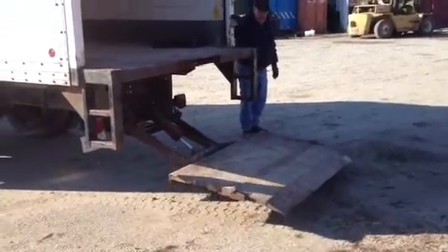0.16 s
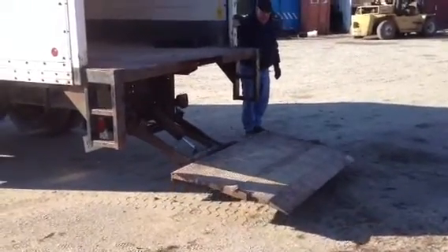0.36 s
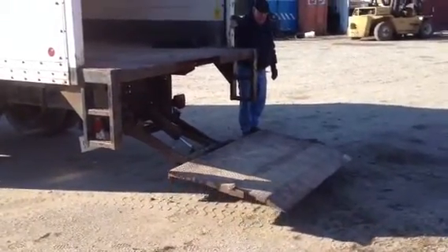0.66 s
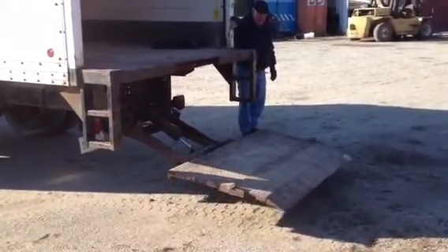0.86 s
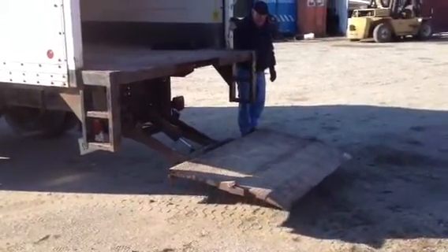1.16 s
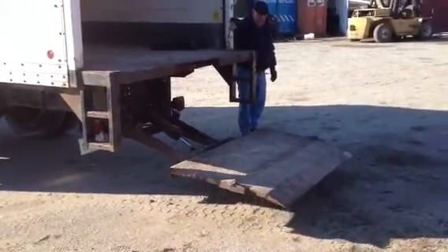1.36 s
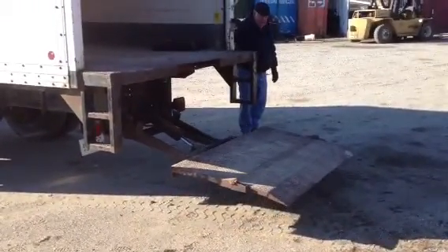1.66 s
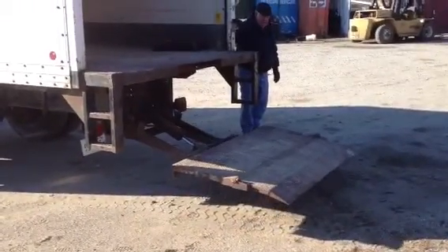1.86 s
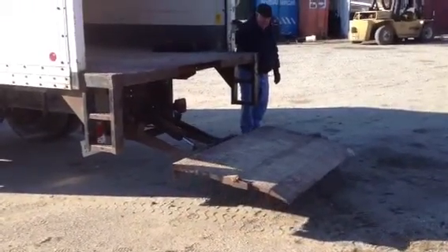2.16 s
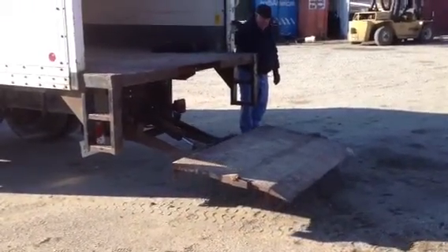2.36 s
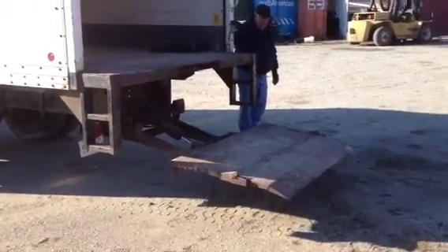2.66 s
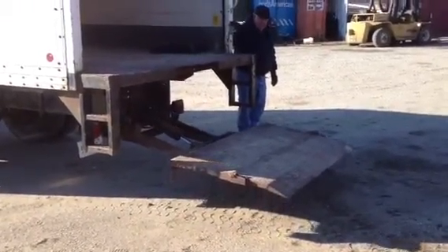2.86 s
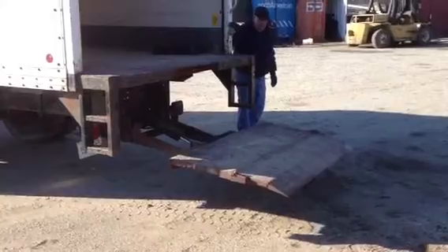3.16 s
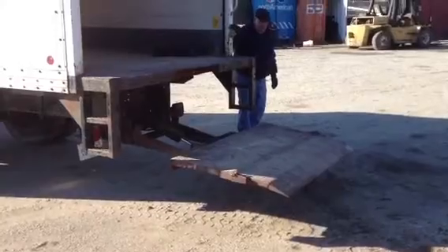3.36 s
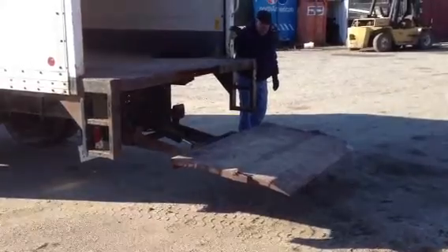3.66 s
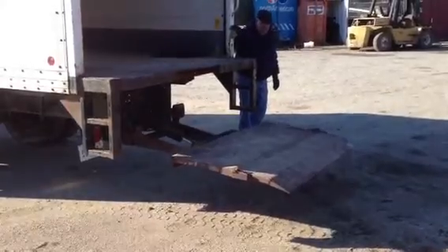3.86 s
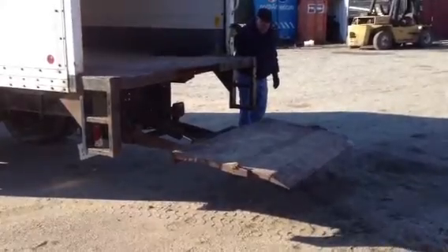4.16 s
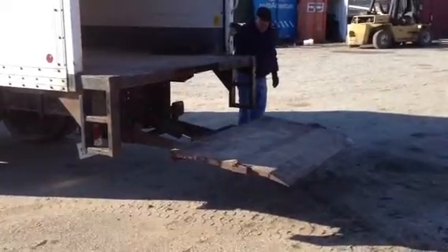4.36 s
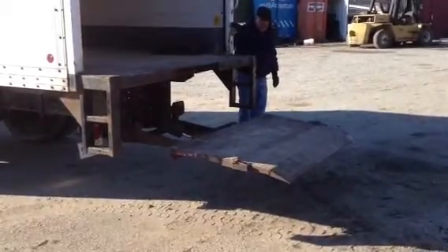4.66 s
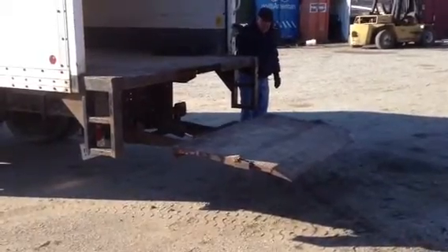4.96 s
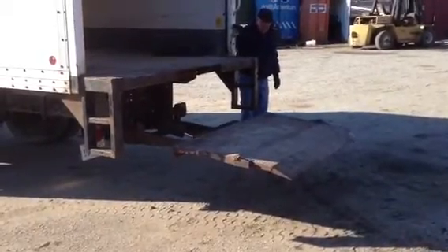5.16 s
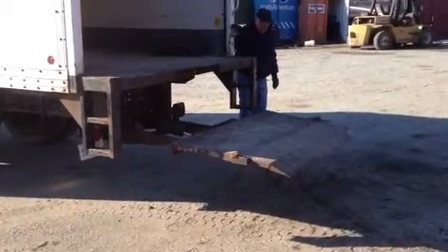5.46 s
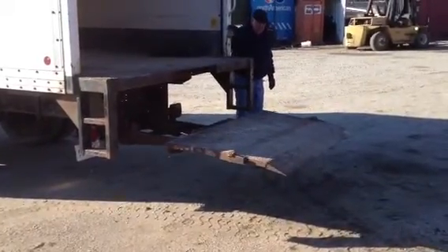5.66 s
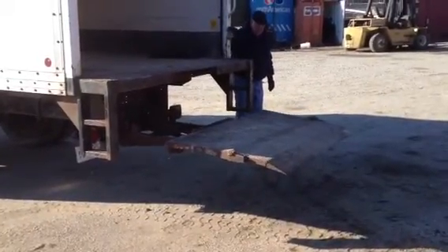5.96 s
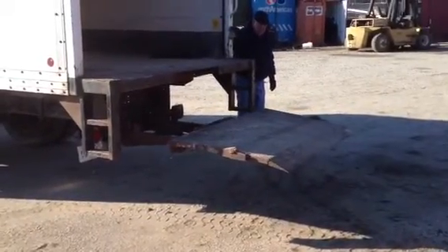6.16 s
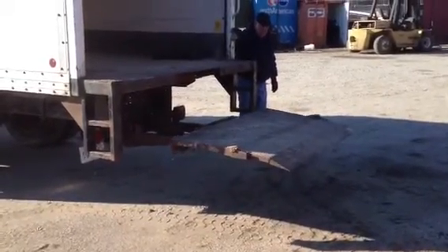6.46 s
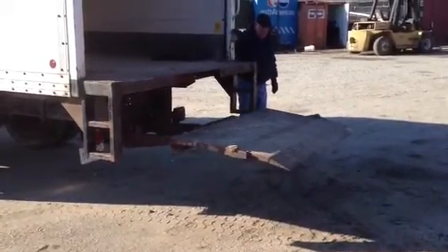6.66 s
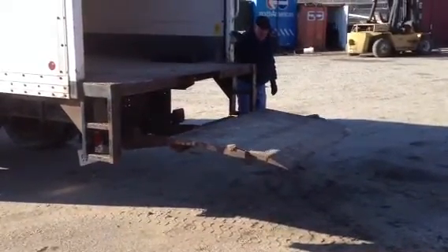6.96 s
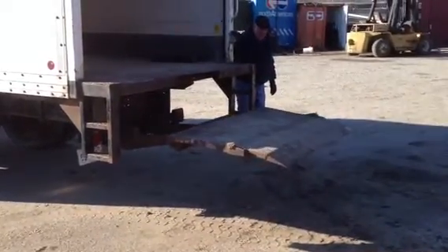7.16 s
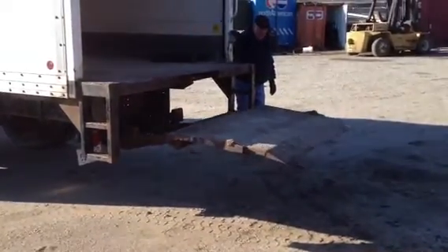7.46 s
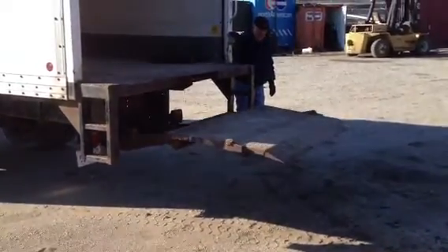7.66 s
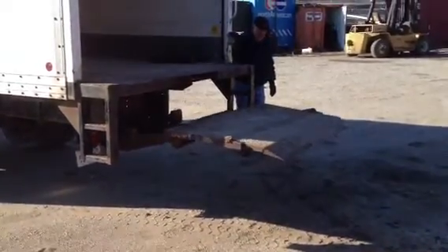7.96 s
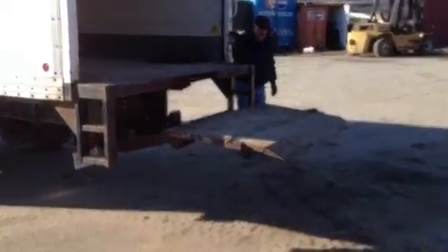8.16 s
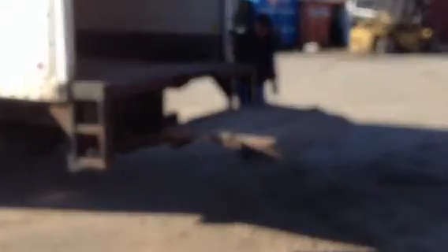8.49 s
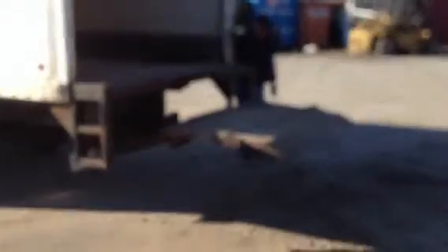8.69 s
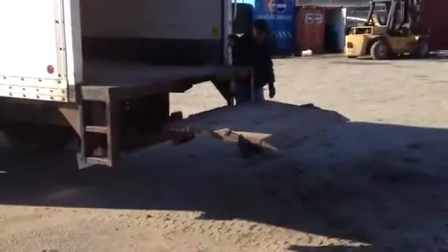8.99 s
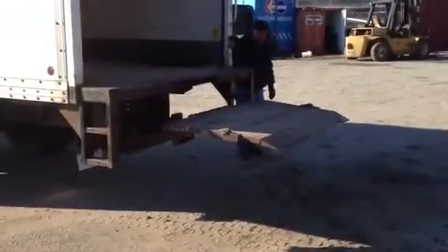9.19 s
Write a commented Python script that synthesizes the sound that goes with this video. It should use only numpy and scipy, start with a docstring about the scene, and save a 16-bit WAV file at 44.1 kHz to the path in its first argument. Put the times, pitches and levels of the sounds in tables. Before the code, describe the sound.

Gusty wind rumbles on the microphone while a diesel truck idles and its lift gate rises with a thin electric whine and faint metal rubbing.

```python
"""From the start, a six-cylinder diesel idles in an open yard and gusts buffet the microphone,
while an electric hydraulic pump whines as it slowly raises a truck's lift gate.
After about 3 s, the engine shakes a loose part into short chirps. The gate's dry pivots rub
louder and louder under the load, and its linkage snaps once near 6.5 s.
Then the rubbing fades, the strongest gust hits near 8.6 s, and the pump whines on to the end."""
import sys
import numpy as np
from scipy import signal
from scipy.fft import rfft, irfft, next_fast_len
from scipy.io import wavfile
from scipy.ndimage import uniform_filter1d, map_coordinates

SR = 44100
rng = np.random.default_rng(int(sys.argv[2]) if len(sys.argv) > 2 else 0)


def digitize_waveform(pressure):
    """Quantize a signal to 16-bit integers and store it at the path in sys.argv[1].

    Rows of a 2-D input are taken as channels; values are limited to [-1, 1].
    """
    field = np.atleast_2d(pressure).T
    bounded = np.clip(field, -1, 1)
    quanta = np.round(bounded * 32767).astype(np.int16)
    wavfile.write(sys.argv[1], SR, quanta)


N = 411453
T = np.arange(N) / SR
FIRING_HZ, CYLINDERS = 34.99, 6  # one engine cycle is six firings, one per cylinder


def undb(db):
    """Turn decibels into a number to multiply a sound by."""
    return 10 ** (np.asarray(db) / 20)


def unit(x):
    """Scale a signal so that its average (rms) level is 1."""
    return x / np.sqrt(np.mean(x ** 2))


def curve(rows):
    """Join rows of (time_s, value) with straight lines."""
    return np.interp(T, *np.transpose(rows))


def noise():
    """White noise: an even hiss at level 1."""
    return rng.standard_normal(N)


def wander(rate_hz):
    """A smooth random drift of about 1 either way, with rate_hz new values a second."""
    knots = rng.standard_normal(int(N / SR * rate_hz) + 2)
    return unit(map_coordinates(knots, [T * rate_hz], order=2, mode="nearest"))


def colour(x, points):
    """Shape the bass and treble along (pitch_hz, gain_db) points; white noise keeps its level."""
    size = 2 * next_fast_len(N // 2 + 4096)
    hz, db = np.transpose(points)
    freqs = np.maximum(np.arange(size // 2 + 1) * SR / size, 1)
    octaves_above = np.maximum(np.log2(freqs / hz[-1]), 0)
    gain = unit(undb(np.interp(np.log(freqs), np.log(hz), db) - 20 * octaves_above))
    # these steps make the filter ring only after a hit, never before it
    cepstrum = irfft(np.log(gain))
    cepstrum[1:size // 2] *= 2
    cepstrum[size // 2 + 1:] = 0
    return irfft(rfft(x, size) * np.exp(rfft(cepstrum)))[:N]


def ring(x, pitch_hz, width_hz):
    """Make a sound ring like metal by passing it twice through a filter width_hz wide."""
    peak = signal.iirpeak(pitch_hz, pitch_hz / width_hz, fs=SR)
    return signal.lfilter(*peak, signal.lfilter(*peak, x))


def bursts(rows):
    """Quick swells in loudness that die away, from rows of (start_s, peak_db, length_s)."""
    out = np.zeros(N)
    for start_s, peak_db, length_s in rows:
        start = int(start_s * SR)
        age = T[:min(N - start, SR // 4)] / (length_s / 2)
        out[start:start + len(age)] += undb(peak_db) * np.sqrt(2 * np.e) * age * np.exp(-age ** 2)
    return out


def turbulence(points, evenness):
    """Churning air: shaped noise whose chance swells are smoothed out as evenness nears 1."""
    air = colour(noise(), points)
    power = uniform_filter1d(uniform_filter1d(air ** 2, size=600), size=600)
    return unit(air / power ** (evenness / 2))


# Gusts of wind: start_s, length_s, level_db
GUSTS = [(0.0, 0.041, -29.5), (0.065, 0.1, -26.5), (0.25, 0.1, -31), (0.451, 0.075, -25),
         (0.567, 0.25, -25.5), (0.936, 0.06, -22), (1.035, 0.15, -31.5), (1.204, 0.051, -26.5),
         (1.298, 0.15, -25.5), (1.536, 0.17, -25.5), (1.72, 0.047, -34), (1.905, 0.027, -25),
         (2.025, 0.17, -28.5), (2.309, 0.59, -25), (3.449, 0.028, -26), (3.566, 0.18, -25),
         (4.159, 0.023, -26.5), (4.289, 0.07, -28.5), (4.599, 0.1, -28.5), (4.811, 0.11, -24),
         (4.944, 0.06, -32.5), (5.187, 0.094, -31), (5.376, 0.071, -32), (5.493, 0.07, -25.5),
         (5.627, 0.13, -35), (5.931, 0.1, -27), (6.065, 0.098, -21), (6.522, 0.1, -37),
         (7.032, 0.092, -35.5), (7.35, 0.17, -36), (7.529, 0.11, -25.5), (7.831, 0.15, -32),
         (8.347, 0.25, -23), (8.62, 0.23, -16), (8.87, 0.22, -31.5), (9.124, 0.19, -24.5)]

def gusts(rise_s=0.0097, fall_s=0.015):
    """How hard the gusts push: each rises quickly, holds and dies away."""
    push = np.zeros(N)
    for start_s, length_s, level_db in GUSTS:
        rise = np.clip((T - start_s) / rise_s + .5, 0, 1)
        fall = np.exp(-np.clip((T - start_s - length_s) / fall_s, 0, 20))
        push = np.maximum(push, undb(level_db) * rise * fall)
    return push


# Single hard swirls of air: start_s, peak_db, rasp_db (relative to that peak)
SWIRLS = [(0.092, -27, 3), (0.133, -20.5, -22), (0.278, -15.5, -15), (0.597, -19, -5), (0.769, -21.5, -9),
          (0.953, -23.5, -7), (1.389, -20.5, -11), (1.586, -20.5, -10), (1.639, -22, -5),
          (1.846, -27.5, -19), (2.245, -30, -16), (2.317, -19.5, -2), (2.416, -21, -10), (2.436, -17, -16),
          (2.528, -19, -3.5), (2.626, -9.5, -20), (2.676, -20.5, -11), (2.804, -21, -2.5),
          (2.827, -15.5, -12), (2.985, -22.5, -21), (3.457, -18.5, -27), (3.573, -25, -3), (3.609, -17, -5),
          (3.708, -18, -16), (3.87, -23.5, -12), (4.169, -21, -14), (4.805, -15.5, -9), (4.893, -19, -24),
          (5.263, -27, -8), (5.413, -19.5, -8), (5.5, -21, -6), (5.552, -21, -13), (5.824, -24.5, -14),
          (5.952, -12, -6), (6.013, -15.5, -24), (6.148, -20.5, -7), (6.289, -24.5, -7.5), (7.07, -24, -10),
          (7.228, -32, -6), (7.443, -23, -29), (7.529, -11, -5), (7.546, -15, -10), (7.97, -25.5, -16),
          (8.378, -13.5, -7), (8.62, -20, -1), (8.652, -17, 4.5), (8.723, -16, 2), (8.764, -16, -4),
          (8.796, -9, -10), (8.95, -17, -28), (9.13, -24, -8), (9.194, -27, -4), (9.252, -16, -8)]
# Tone of the wind's low rumble and of its rougher rasp: pitch_hz, gain_db
RUMBLE_TONE = [(40, -19.5), (90, -10.5), (140, 2.5), (250, 1.5), (340, -4.5), (500, -14), (750, -27),
               (1100, -41), (2000, -61)]
RASP_TONE = [(150, -38.5), (350, 4.5), (550, 3), (800, -4), (1100, -12.5), (1500, -21.5), (2200, -39.5),
             (4000, -60)]

def wind(breeze_db=-46, hard_gust_db=-18, swirl_s=0.018, low_cut_hz=84):
    """Air rumbles on the microphone's opening; the harder it hits, the more it rasps."""
    breeze = undb(breeze_db + 5.5 * wander(13))
    gusting = gusts() * undb(1.5 * wander(30))
    flow = np.hypot(breeze, gusting) * undb(2.5 * wander(90))
    swirls = bursts([(s, db, swirl_s) for s, db, _ in SWIRLS])
    hardness = (flow / undb(hard_gust_db)) ** 1.7  # rasp grows faster than rumble
    gust_rasp = undb(hard_gust_db - 13.5 + 2 * wander(200)) * hardness
    swirl_rasp = undb(-1) * bursts([(s, db + rasp_db, swirl_s) for s, db, rasp_db in SWIRLS])
    rumble = np.hypot(flow, swirls) * turbulence(RUMBLE_TONE, evenness=0.84)
    rasp = np.hypot(gust_rasp, swirl_rasp) * turbulence(RASP_TONE, evenness=0.29)
    # the opening lets no slow pressure changes through
    return signal.sosfilt(signal.butter(4, low_cut_hz, "high", fs=SR, output="sos"), rumble + rasp)


def pulses(firings, decay, rise):
    """A swell and fade each time the firing count passes a whole number; times are in firings."""
    age = firings % 1
    return unit(np.exp(-age / decay) * (1 - np.exp(-age / rise)))


def rattle(firings, repeat):
    """Many tiny hits of engine parts; the share called repeat is the same in every cycle."""
    cycle_samples = CYLINDERS * SR / FIRING_HZ
    place = (firings / CYLINDERS) % 1 * cycle_samples
    pattern = rng.standard_normal(int(cycle_samples) + 2)
    looped = map_coordinates(pattern, [place], order=3, mode="nearest")
    return np.sqrt(repeat) * unit(looped) + np.sqrt(1 - repeat) * noise()


# Tone of the exhaust: pitch_hz, gain_db
EXHAUST_TONE = [(35, -56), (62, -15), (85, -11), (165, 7.5), (260, 0), (340, -9), (450, -11.5), (650, -21),
                (1200, -34)]

def exhaust(firings, level_db=-41.5):
    """The exhaust drones low, partly repeating with each engine cycle."""
    return undb(level_db) * colour(rattle(firings, repeat=0.4), EXHAUST_TONE)


# Knocks in one engine cycle: place_firings, gain_db
KNOCKS = [(.14, -4), (.69, -6), (1.14, -4), (2.09, -0.5), (2.89, -12), (3.16, -11.5), (4.09, -5.5),
          (4.79, -6), (5.14, -0.5), (5.89, -6.5)]
# Tone of the engine block: pitch_hz, gain_db
BLOCK_TONE = [(350, -21.5), (580, -7.5), (680, 4.5), (750, -3), (840, 5.5), (960, 5), (1110, 2.5),
              (1220, -8.5), (1500, -24), (1900, -8.5), (2300, -22.5), (4000, -51.5)]

def block_knock(firings, level_db=-44.5, width_firings=.11):
    """Injectors and valves knock the block at the same places in each cycle, over a steady rattle."""
    force = np.full(N, .7)
    for place, gain_db in KNOCKS:
        distance = (firings - place + CYLINDERS / 2) % CYLINDERS - CYLINDERS / 2
        force += undb(gain_db) * np.exp(-(distance / width_firings) ** 2)
    return undb(level_db) * colour(unit(force * rattle(firings, repeat=0.63)), BLOCK_TONE)


# Tone of the valves: pitch_hz, gain_db
VALVE_TONE = [(700, 1.5), (1300, 3.5), (1950, 2.5), (2200, 1), (2650, -0.5), (2820, 1.5), (3000, -3),
              (3350, -6), (3800, -9), (4300, -18), (5600, -25), (9000, -24.5)]

def valve_clatter(firings, level_db=-48):
    """Each firing sets the valve parts clattering."""
    swell = (1 + 0.59 * pulses(firings + .2, decay=0.47, rise=.3)) * undb(0.94 * wander(25))
    return undb(level_db) * colour(unit(swell * rattle(firings, repeat=0.51)), VALVE_TONE)


# Strength of the hiss for each of the six cylinders: gain_db
CYLINDER_GAINS = [0.15, 0.5, 0.37, 1.1, 0.41, 0]
# Loudness of the hiss: time_s, level_db (before boost_db is added)
HISS_LEVEL = [(0, -65.5), (1.7, -65), (2.05, -63), (3.8, -63), (4.45, -61), (4.75, -63.5), (6.4, -64),
              (7.3, -65.5), (8.6, -64), (9.33, -68)]
# Tone of the hiss: pitch_hz, gain_db
HISS_TONE = [(3000, -14), (4500, -4.5), (5400, -5), (6900, -3), (8100, 0.5), (9500, -7), (11000, -6),
             (12000, -11.5), (13800, -10), (15500, -12.5)]

def engine_hiss(firings, boost_db=1.0):
    """A fine hiss pulses with the firings, a little differently for each cylinder."""
    strength = undb(CYLINDER_GAINS)[np.floor(firings).astype(int) % CYLINDERS]
    swell = strength * (1 + 0.49 * pulses(firings + 0.24, decay=0.4, rise=.4))
    flicker = undb(wander(35) + 1.15 * wander(400))
    return undb(curve(HISS_LEVEL) + boost_db) * colour(unit(swell * flicker * noise()), HISS_TONE)


# Loudness of the sizzle: time_s, level_db
SIZZLE_LEVEL = [(0, -68), (2, -67), (4.2, -64.5), (4.8, -66), (6.2, -64), (7, -64), (7.5, -69),
                (8.5, -66.5), (9.33, -68.5)]

def sizzle(firings, sputter_db=3):
    """Thin metal sizzles unevenly after each firing."""
    shake = pulses(firings + .15, decay=0.85, rise=.3) * undb(sputter_db * wander(45)) * noise()
    return undb(curve(SIZZLE_LEVEL)) * unit(ring(shake, pitch_hz=6370, width_hz=680))


# Steady notes of the engine and its belts: pitch_hz, level_db
HUM_NOTES = [(105, -53), (140, -55.5), (176, -50), (315, -59.5), (963, -56), (1032, -58), (1102, -60),
             (1897, -64.5), (2686, -72.5)]

def engine_hum():
    """The turning engine and its belts hum with slightly wavering notes."""
    hum = np.zeros(N)
    for pitch_hz, level_db in HUM_NOTES:
        height = np.sqrt(2) * undb(level_db + 2.1 * wander(9))
        hum += height * np.sin(2 * np.pi * pitch_hz * T + 0.7 * wander(8))
    return hum


def diesel(first_firing_s=0.001017):
    """An idling engine: a slightly uneven count of firings keeps its noises in step."""
    firings = (T - first_firing_s) * FIRING_HZ + 0.0154 * wander(3)
    body = exhaust(firings) + block_knock(firings) + valve_clatter(firings)
    return body + engine_hiss(firings) + sizzle(firings) + engine_hum()


# Chirps, some one engine cycle apart: start_s, peak_db (before gain_db is added), pitch_hz
CHIRPS = [(3.115, -42, 2340), (3.15, -46, 2850), (3.29, -56, 3850), (3.63, -55, 3850), (3.8, -56, 3850),
          (4.31, -55, 3850), (4.48, -56, 3850), (5.52, -57, 3950), (6.027, -56, 3980), (6.198, -52, 3920),
          (6.97, -54, 6500), (7.05, -56, 3900), (8.232, -53, 3930), (8.402, -52, 3890),
          (8.573, -53.5, 3930), (8.744, -51, 3930), (9.26, -57, 3950)]

def loose_part(gain_db=-1.0, length_s=0.023):
    """Shaken by the engine, dry metal chirps in short, rough slips."""
    roughness = 1.1 * wander(450)
    chirps = np.zeros(N)
    for start_s, peak_db, pitch_hz in CHIRPS:
        chirps += bursts([(start_s, peak_db, length_s)]) * np.sin(2 * np.pi * pitch_hz * T + roughness)
    return undb(gain_db) * chirps


# Ringing notes of the steel lift arms: pitch_hz, half_width_hz, gain_db
ARM_NOTES = [(1353, 65, 7), (1495, 110, 9.5), (2340, 39, 7), (2850, 31, 4), (3730, 90, -5),
             (4930, 70, -9.5)]
# Loudness of the rubbing: time_s, level_db
RUB_LEVEL = [(0, -77), (5.5, -56), (6.1, -54.5), (6.7, -52), (7.3, -56.5), (8.7, -60), (9.33, -67)]

def pivot_rub():
    """The gate's dry pivots rub under load and make the lift arms ring."""
    friction = noise() * undb(2.5 * wander(60))
    arms = sum(undb(db) * ring(friction, hz, 2 * half_width) for hz, half_width, db in ARM_NOTES)
    return undb(curve(RUB_LEVEL)) * unit(arms)


def grit_scrape(start_s=4.372, peak_db=-57, length_s=.018):
    """Grit in the gate gives one tiny, bright scrape."""
    scrape = colour(noise(), [(3000, -20), (8000, 0), (11000, -2), (15000, -12)])
    return bursts([(start_s, peak_db, length_s)]) * scrape


# Tone of the snap: pitch_hz, gain_db
SNAP_TONE = [(80, -8), (250, 9), (700, 4), (1600, -5), (3000, -9), (5000, -25), (8500, -20.5), (11000, -28),
             (15000, -34)]

def linkage_snap(start_s=6.471, kick_db=-12, thud_db=-27, thud_s=0.005):
    """The gate's linkage snaps once: a sharp click with a short, low thud."""
    kick = undb(kick_db) * (np.arange(N) == int(start_s * SR))
    low_noise = colour(noise(), [(80, -12), (230, 0), (700, -9), (1600, -24)])
    return colour(kick, SNAP_TONE) + bursts([(start_s, thud_db, thud_s)]) * low_noise


# Loudness of the gear whine: time_s, level_db (before whine_gain_db is added)
WHINE_LEVEL = [(0, -60), (1.1, -52.5), (3.1, -62), (3.5, -52.5), (4, -51), (4.8, -56.5), (5.5, -51),
               (6.4, -51), (7.1, -55.5), (7.42, -49.5), (8.7, -48), (9.33, -50)]
# Thin, high notes of the motor: waves_per_turn, gain_db
MOTOR_NOTES = [(24, -1), (28, -4), (29, -4)]
# Loudness that those gains are added to: time_s, level_db
MOTOR_LEVEL = [(0, -73), (2, -68.5), (4, -66), (6.5, -67), (7.6, -72), (9.33, -71)]

def pump(pitch_hz=1611, creep_hz_per_s=1.72, sag_hz=12.11, settle_s=0.2994, teeth=14, whine_gain_db=-3):
    """Gear teeth and motor contacts whine in step with the turning shaft."""
    # the pitch settles just after the start, then creeps up as the load eases
    whine_hz = pitch_hz + creep_hz_per_s * T - sag_hz * np.exp(-T / settle_s)
    shaft_angle = 2 * np.pi * np.cumsum(whine_hz / teeth) / SR + .006 * wander(12)
    gears = undb(curve(WHINE_LEVEL) + whine_gain_db + 0.4 * wander(10)) * np.sin(teeth * shaft_angle)
    motor = sum(undb(db + wander(6.5)) * np.sin(waves * shaft_angle) for waves, db in MOTOR_NOTES)
    return np.sqrt(2) * (gears + undb(curve(MOTOR_LEVEL)) * motor)


def scene():
    """All the sounds meet at one microphone."""
    background = wind() + diesel() + loose_part()
    gate = pivot_rub() + grit_scrape() + linkage_snap()
    return (background + gate + pump())[None]


def record(dry, low_cut_hz=40, high_cut_hz=15400):
    """The deepest bass is thinned and the highest treble is cut off."""
    thinned = signal.sosfilt(signal.butter(2, low_cut_hz, "high", fs=SR, output="sos"), dry)
    return signal.sosfilt(signal.ellip(10, .2, 80, high_cut_hz, fs=SR, output="sos"), thinned)


dry = scene()
out = record(dry)
digitize_waveform(out)
```